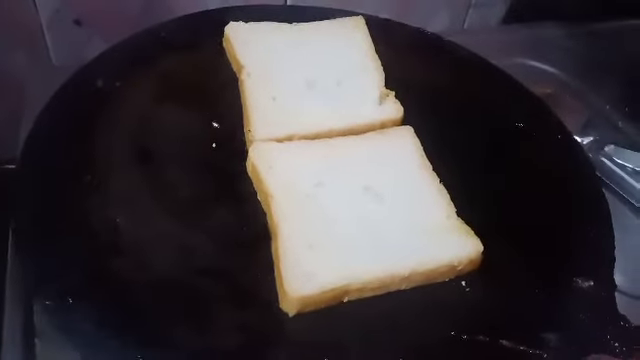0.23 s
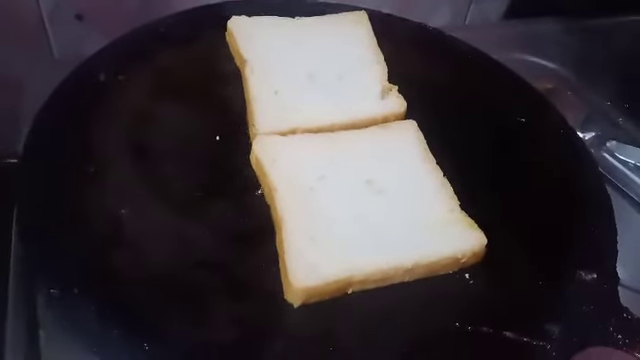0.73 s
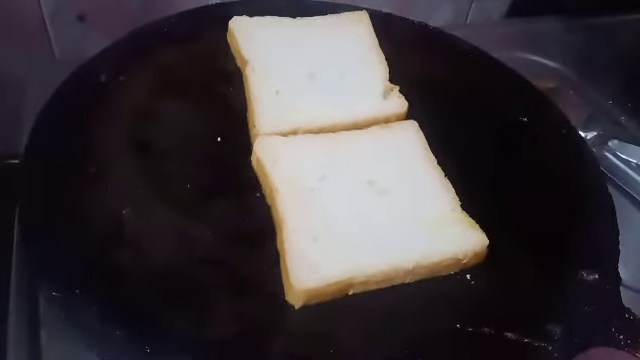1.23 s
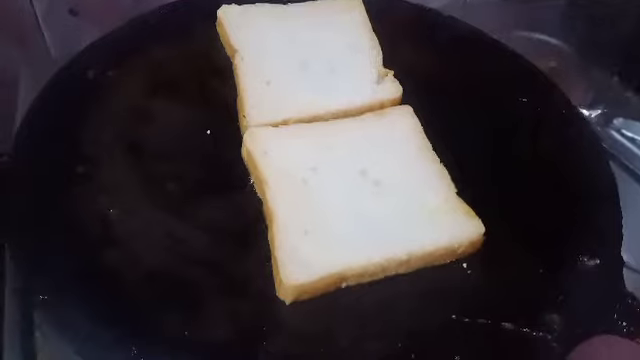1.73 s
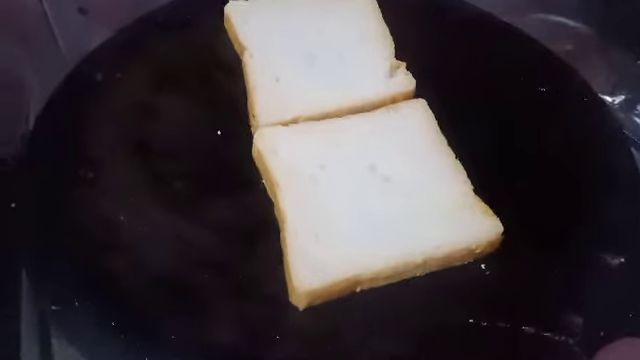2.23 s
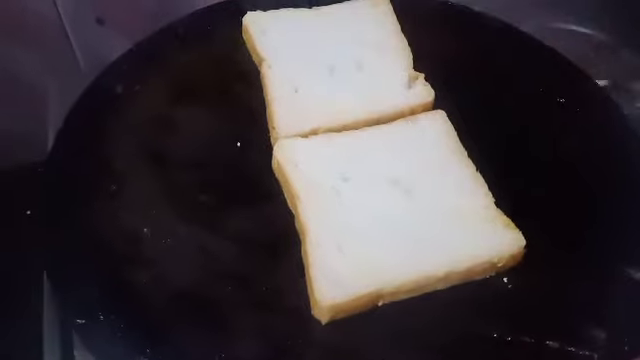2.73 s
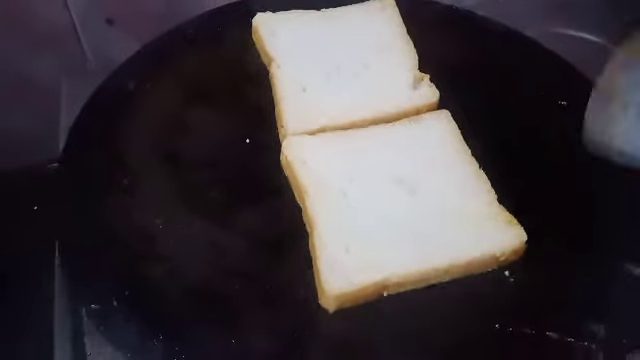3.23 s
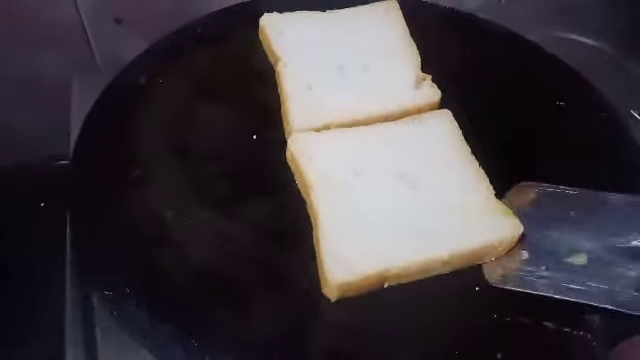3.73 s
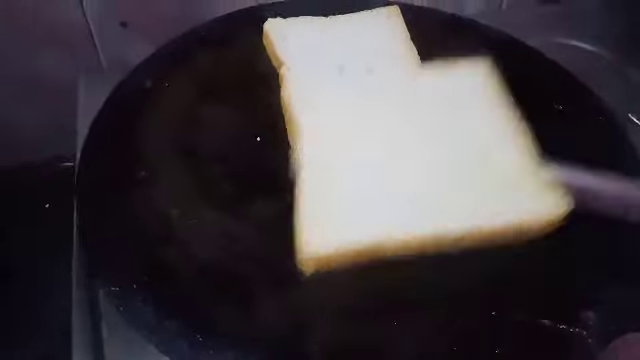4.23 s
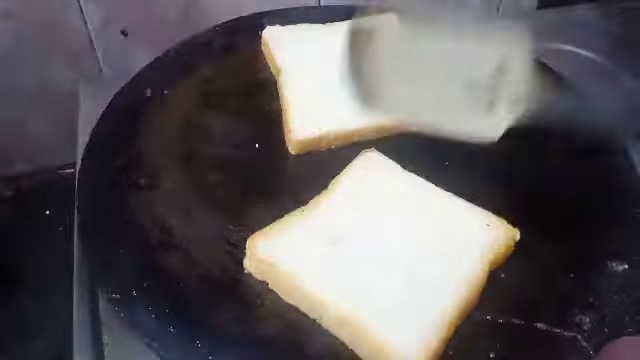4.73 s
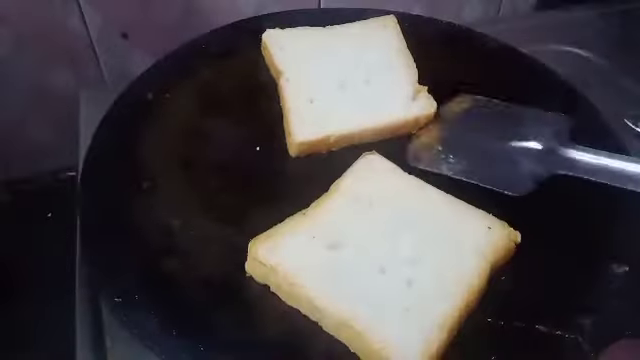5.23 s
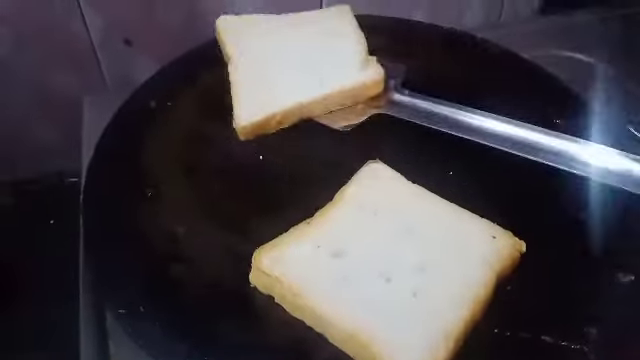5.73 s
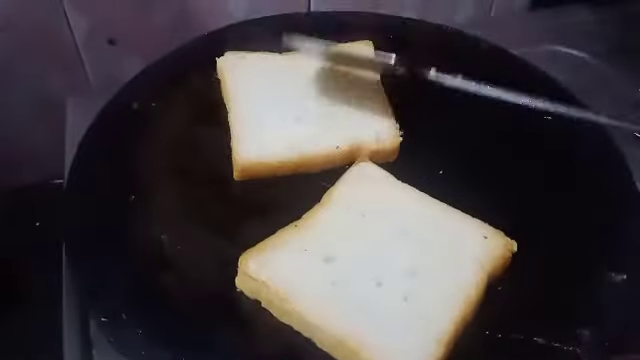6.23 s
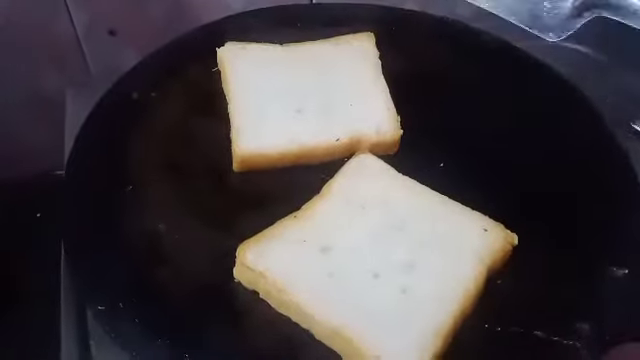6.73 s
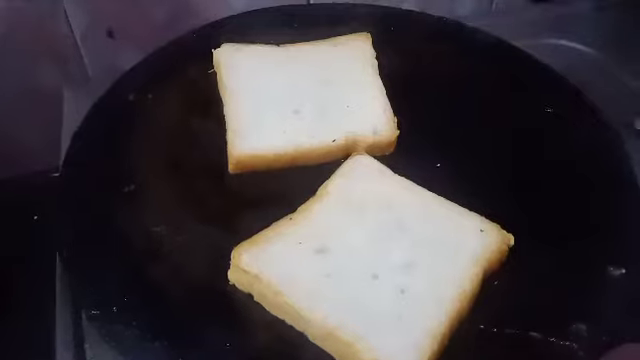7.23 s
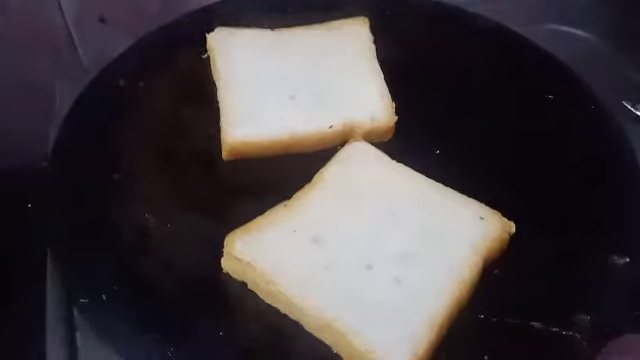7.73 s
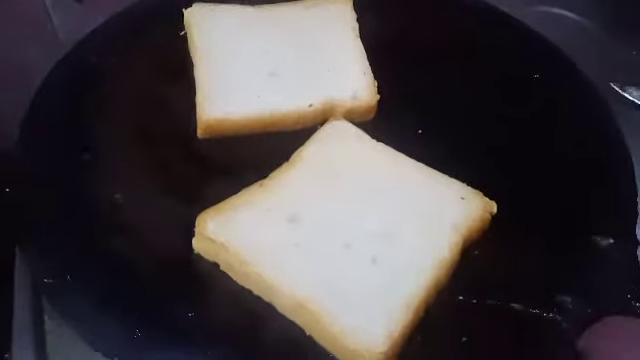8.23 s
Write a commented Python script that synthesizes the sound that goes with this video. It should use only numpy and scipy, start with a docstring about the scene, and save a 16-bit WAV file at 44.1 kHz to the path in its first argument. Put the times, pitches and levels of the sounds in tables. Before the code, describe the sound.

Quiet frying hiss in a small kitchen, a steel clink, then spatula knocks, two short scrapes and soft bread thuds, with crackle growing afterwards.

```python
"""A low rumble, a faint sizzle and a thin whistle in a small kitchen; bread toasts on a flat iron griddle.
A steel utensil clinks; a spatula is picked up, knocks on the iron, scrapes under each of two slices and
flips it; the turned slices make the fat spit. Struck bodies are sums of decaying modes, scrapes are random
slips through such modes, frying is dense random clicks, rumble and air are filtered noise."""
import sys
import numpy as np
from scipy import signal
from scipy.fft import rfft, irfft, next_fast_len
from scipy.io import wavfile
from scipy.ndimage import uniform_filter1d, map_coordinates

SR = 44100
rng = np.random.default_rng(int(sys.argv[2]) if len(sys.argv) > 2 else 0)


def generate_wav(signal):
    """Clip the signal to [-1, 1] and save it as 16-bit WAV at the path in sys.argv[1]."""
    frames = np.transpose(np.atleast_2d(signal))
    scaled = np.clip(frames, -1, 1) * 32767
    pcm = np.round(scaled).astype(np.int16)
    wavfile.write(sys.argv[1], SR, pcm)


N = 373022
TIME = np.arange(N) / SR
CUTOFF_HZ = 15900

# spectrum of clattering iron: pitch_hz, level_db
CLATTER_SPECTRUM = [(200, 8.5), (450, -0.5), (650, 1.5), (1400, -2.5), (2000, -3), (3900, 3), (5000, 0),
                    (7300, 12), (8700, 0.5), (11000, 9), (16000, 16)]


def amp(db):
    """Amplitude factor of a level in dB."""
    return 10 ** (np.asarray(db) / 20)


def rms_one(x):
    """Scale to rms 1."""
    return x / np.sqrt(np.mean(x ** 2) + 1e-20)


def colour(x, points):
    """Shape a sound by a spectrum of (Hz, dB) points, interpolated over log frequency."""
    hz, db = np.transpose(points)
    size = next_fast_len(len(x) + SR // 10)
    bins_hz = np.maximum(np.fft.rfftfreq(size, 1 / SR), 1)
    gain = amp(np.interp(np.log(bins_hz), np.log(hz), db))
    return irfft(rfft(x, size) * gain, size)[:len(x)]


def band(x, low_hz, high_hz, order=2):
    """Butterworth band-pass, its edges kept within the valid range."""
    edges_hz = np.clip([low_hz, max(high_hz, low_hz * 1.02)], [10, 20], [.43 * SR, .45 * SR])
    return signal.sosfilt(signal.butter(order, edges_hz, "band", fs=SR, output="sos"), x)


def noise(size=N):
    """White noise of spread 1."""
    return rng.standard_normal(size)


def drift(rate, size=N):
    """Slow chance: straight lines between random knots of spread 1, rate knots per second."""
    knots = rng.standard_normal(4096)
    return np.interp(TIME[:size] * rate, np.arange(len(knots)), knots)


def fade(t60_s):
    """One second of exponential decay."""
    return amp(-60 * TIME[:SR] / max(t60_s, 1e-4))


def ring(modes, tilt_db=0, length=1, scatter_db=0, flutter_db=0):
    """One second of a struck body; scatter reweights its modes at each blow, flutter wavers their levels."""
    chance = rng.standard_normal(len(modes))
    out = np.zeros(SR)
    for k, (hz, db, t60_s) in enumerate(modes):
        mode_db = db + tilt_db * np.log2(hz / 1500) + scatter_db * chance[k]
        level = amp(mode_db + flutter_db * drift(86, size=SR))
        out += (-1) ** k * level * fade(t60_s * length) * np.sin(2 * np.pi * hz * TIME[:SR])
    return out


def add(out, s, sound):
    """Mix a sound in at s seconds."""
    start = max(int(s * SR), 0)
    out[start:start + len(sound)] += sound[:N - start]


def through(x, response):
    """Convolve with a response."""
    return signal.oaconvolve(x, response)[:N]


def grains(per_s, spread_db):
    """Random clicks, most of them small; rms 1."""
    sizes = amp(spread_db * np.minimum(rng.exponential(1, N), 5)) * rng.choice([-1, 1], N)
    return rms_one(sizes * (rng.random(N) < per_s / SR))


def envelope(s, length_s, attack_s, release_s):
    """A straight rise, a hold until the length is over, an exponential release."""
    rise = np.clip((TIME - s) / attack_s, 0, 1)
    return rise * np.exp(-np.maximum(TIME - s - length_s, 0) / release_s)


def wavering(hz, wobble, rate):
    """A sine whose pitch wanders by a share of itself."""
    return np.sin(2 * np.pi * np.cumsum(hz * (1 + wobble * drift(rate))) / SR)


def evened(x, size=2205):
    """Level held near rms 1 over about 50 ms; the fine grain stays."""
    return x / np.sqrt(np.maximum(uniform_filter1d(x ** 2, size), 1e-20))


def kitchen(x):
    """Near walls return a short diffuse tail of unit energy."""
    onset = np.clip(TIME[:SR] / 0.00024 - .5, 0, 1)
    tail = band(noise(SR), 120, 6300, order=1) * fade(0.34) * onset
    return through(x, tail / np.sqrt(np.sum(tail ** 2)))


def background(count=26):
    """A lumpy low rumble swells now and then; faint narrow bands waver over the still air of the room."""
    # strongest swells of the rumble: centre_s, level_db, pitch_hz
    swells = [(.12, -54.5, 88.6), (.32, -53, 85.4), (1.228, -53, 99.2), (1.398, -64, 253),
              (4.39, -56, 90.8), (6.138, -55.5, 110), (7.064, -49.5, 243.4), (7.166, -49.5, 110),
              (7.255, -50, 236.3), (7.648, -49, 108), (7.99, -50.5, 107)]
    # spectrum of the wavering room hum: pitch_hz, level_db
    waver_spectrum = [(450, 0.5), (620, 1.5), (900, 5), (1150, 0), (1550, 6.5), (2000, 0), (2800, 2.5),
                      (3800, -32)]
    # spectrum of the still air: pitch_hz, level_db
    air_spectrum = [(25, -2), (50, 4.5), (90, 16.5), (115, 16), (155, 4.5), (230, 10), (330, 6.5),
                    (410, -6.5), (620, -8), (1200, -27), (2800, -10), (4000, -16), (16000, -41)]
    rumble_hz, swell_cycles = 100, 7.5  # cycles from a swell's peak down to 1/e
    low = rms_one(band(noise(), rumble_hz / 1.05, rumble_hz * 1.12))
    boom = rms_one(band(noise(), 208, 287.4))  # upper part of the rumble
    rumble = amp(-70 + 4.5 * drift(9.1)) * low + amp(-74 + 6.5 * drift(18)) * boom
    for s, db, hz in swells:
        swell = amp(db + 2 * drift(45)) * np.exp(-((TIME - s) * hz / swell_cycles) ** 2)
        rumble += swell * wavering(hz, wobble=0.088, rate=130)
    patches = np.zeros(N)
    for hz in np.geomspace(520, 3500, count):
        patches += band(noise(), hz / 1.015, hz * 1.045) * amp(12.3 * np.tanh(drift(12)))
    hum = amp(-67.0) * rms_one(colour(patches, waver_spectrum))
    air = amp(-66.5) * rms_one(colour(noise(), air_spectrum))
    return rumble + hum + air


def frying():
    """Countless tiny bursts merge into a hiss; turned bread adds coarser crackle, steam escapes in puffs."""
    # vigour of the frying: time_s, level_db
    vigour_points = [(0, -58.5), (2.4, -54), (3.3, -53.5), (5.5, -55.5), (8, -51), (8.46, -54.5)]
    # spectrum of the hiss: pitch_hz, level_db
    hiss_spectrum = [(2500, -24.5), (4200, -15), (5000, -8.5), (5700, -3), (6600, 0.5), (7500, -5.5),
                     (8700, -13.5), (13000, -18), (16000, -18)]
    # turned slices that crackle as they heat: landing_s, crackle_db (against the vigour)
    flips = [(4.54, -17.5), (6.1, -7)]
    # steam squeezed out under the bread: start_s, length_s, level_db, release_s
    puffs = [(0, 0.91, -66.5, 1), (4.251, 0.026, -52.5, 0.073), (7.374, 0.035, -56.5, 0.05)]
    heating_s, puff_attack_s = 0.26, 0.033
    unturned_db, seeping_db = -42, -18  # against the vigour

    fine = amp(0.35 * drift(31)) * rms_one(colour(grains(per_s=14000, spread_db=3.5), hiss_spectrum))
    ticks = band(grains(per_s=180, spread_db=6.5), 4200, 27000)
    coarse = rms_one(ticks + kitchen(ticks))
    vigour_s, vigour_db = np.transpose(vigour_points)
    vigour = amp(np.interp(TIME, vigour_s, vigour_db))
    crackle = amp(unturned_db)
    for s, db in flips:
        crackle = crackle + amp(db) * (1 - np.exp(-np.maximum(TIME - s, 0) / heating_s))
    flow = amp(seeping_db) * vigour
    for s, length_s, db, release_s in puffs:
        flow += amp(db) * envelope(s, length_s, puff_attack_s, release_s)
    steam = flow * amp(2.5 * drift(23)) * rms_one(band(noise(), 2650, 3400))
    return vigour * (amp(-3.5) * fine + crackle * coarse) + steam


def thin_tones():
    """Faint whistles and a low scuff come and go; the blade's lingering rings are beating sines."""
    # faint whistles and a low scuff: start_s, length_s, pitch_hz, level_db
    faint_tones = [(0, 0.84, 3420, -61), (2.486, 0.095, 720, -56.5), (6.876, .11, 932, -59.5),
                   (7.038, 0.18, 1046, -58)]
    # blade ringing on, held free or after its tip touches the iron: start_s, length_s, pitch_hz,
    # level_db, release_s, beat_depth (0-1)
    lingering_rings = [(2.68, 0.6, 1404, -53.5, 0.025, 0.26), (4.58, 0.99, 4721, -69.5, 0.04, 0.1),
                       (4.951, 0.1, 5700, -44.5, 0.12, 1)]
    beat_hz = 49.3
    out = np.zeros(N)
    for s, length_s, hz, db in faint_tones:
        level = amp(db + 4.6 * drift(70)) * envelope(s, length_s, attack_s=0.0038, release_s=0.046)
        out += level * wavering(hz, wobble=0.0119, rate=260)
    for s, length_s, hz, db, release_s, depth in lingering_rings:
        level = amp(db + 0.8 * drift(43)) * envelope(s, length_s, 0.015, release_s)
        tone = wavering(hz, wobble=0.00199, rate=100)
        beat = depth * wavering(hz + beat_hz, wobble=0.0019, rate=60)
        out += level * (tone + beat)
    return out


def sharp_ticks():
    """Fat spits, and a few times the blade tips the iron: cycles of treble, then a brief fizz."""
    # loudest sharp ticks, mostly spitting fat, a few from the blade tip on iron:
    # time_s (burst 1.2 ms later), level_db (relative)
    ticks = [(0.2369, -33), (4.5433, -29.5), (4.9412, -28), (5.0174, -29), (6.096, -39), (6.264, -34.5),
             (6.4015, -33), (6.603, -33.5), (6.632, -32), (6.9083, -35), (7.0023, -27.5), (7.128, -26.5),
             (7.3403, -25.5), (7.695, -27), (7.87, -29), (7.8976, -32.5), (8.0441, -33), (8.0835, -29.5),
             (8.104, -32)]
    out = np.zeros(N)
    for s, db in ticks:
        low_chance, high_chance = rng.standard_normal(2)
        low_hz, high_hz = 6200 * np.exp(0.049 * low_chance), 14500 * np.exp(0.023 * high_chance)
        burst = ring([(low_hz, 0, .0028), (9000, -4, .0014), (high_hz, -9, .001)])
        fizz = rms_one(band(noise(SR) * amp(2.1 * drift(900, size=SR)), 2900, 23500))
        spray = amp(-24.5) * fizz * fade(0.098)
        add(out, s + 0.0012, amp(db + 6.5) * (burst + spray))
    return band(out, 4300, 16000)  # too small to radiate low notes


def utensil():
    """A steel utensil chatters on its neighbour: each crack pumps the same modes; loose steel flutters."""
    # contacts: start_s, ring_db, crack_db
    clinks = [(0.9911, -45, -24), (0.997, -27.5, -38), (1.006, -30, -26.5), (1.027, -26.5, -37),
              (1.1, -38, -44), (1.137, -43.5, -45)]
    # modes: pitch_hz, level_db, t60_s
    modes = [(3084, -9, 0.11), (3073, 2.5, 0.14), (3100, -13, 0.18), (5200, -4.5, 0.22), (5240, -6, 0.3),
             (6500, -16, 0.13), (6940, -9.5, 0.16), (8900, -17, 0.11), (9768, -18, 0.15),
             (11060, -8.5, 0.08), (14770, -23, 0.11), (15330, -22, .13)]
    out, pushes = np.zeros(N), np.zeros(N)
    for s, ring_db, crack_db in clinks:
        middle = band(noise(SR), 5450, 10000)
        low = amp(-16.5) * band(noise(SR), 880, 6900)
        high = amp(-11.5) * band(noise(SR), 9800, 17000)
        add(out, s, amp(crack_db) * rms_one(middle + low + high) * fade(0.11))
        add(pushes, s, amp([ring_db]))
    pushes = uniform_filter1d(pushes, size=176)  # the ring builds over a few milliseconds
    for hz, db, t60_s in modes:
        swing = signal.lfilter([1], [1, -amp(-60 / (t60_s * SR))], pushes + 1e-18)
        level = amp(db + 4.0 * drift(110))
        out += level * swing * np.sin(2 * np.pi * hz * TIME + drift(50.5) * hz / 7000)
    return out


def iron_ring(t60_s, count=110):
    """The plate's many close modes, each struck with its own strength and phase."""
    out, t = np.zeros(SR), TIME[:SR // 2]
    hz = np.geomspace(250, 12000, count) * np.exp(.015 * rng.standard_normal(count))
    strength = rng.standard_normal(count) * np.sqrt(hz)
    cycles = hz[:, None] * t + rng.random((count, 1))
    out[:len(t)] = strength @ np.sin(2 * np.pi * cycles.astype(np.float32))
    return rms_one(out) * fade(t60_s)


def knocks():
    """The griddle thuds on its stand while its many damped modes give a short clatter."""
    # spatula and bread on the griddle: start_s, thud_db, thud_hz, clatter_db, clatter_centre_hz,
    # clatter_t60_s, edge_tick_db (against the clatter)
    contacts = [(2.368, -27, 315, -28, 1540, 0.065, 2), (2.381, -26, 328, -29, 905, 0.073, 1),
                (2.396, -41, 310, -32, 1080, 0.046, -16), (2.497, -39, 263, -44.5, 700, 0.17, -14),
                (2.639, -21.5, 233, -40, 750, 0.18, -5), (2.765, -32, 224, -50, 1500, 0.29, 6),
                (3.291, -42.5, 313, -21.5, 3050, 0.051, -2.5), (3.673, -70, 282, -36, 1600, 0.11, -29),
                (3.74, -49, 281, -39, 1440, 0.15, -8), (4.264, -45, 243, -41, 4200, 0.19, -19),
                (4.542, -30.5, 246, -27.5, 1200, 0.042, -19), (4.611, -43, 228, -44.5, 1160, 0.078, -20),
                (5.028, -57, 287, -33, 3140, 0.14, 4), (6.104, -29.5, 212, -41, 1030, 0.22, -6),
                (6.333, -54, 198, -50, 1520, 0.18, 2)]
    # griddle on its stand: pitch_hz, level_db, t60_s
    stand = [(228.3, -1, .13), (290, -12, 0.047), (313, -6, 0.13), (481, -1.5, 0.12)]
    half_width = 2 ** (1.6 / 2)  # one contact excites 1.6 octaves
    out = np.zeros(N)
    for s, thud_db, thud_hz, clatter_db, centre_hz, t60_s, edge_db in contacts:
        rattle = noise(SR) * fade(t60_s) * amp(3.8 * drift(180, size=SR) + 5.5)  # dies out unevenly
        plate = colour(iron_ring(t60_s) + rattle, CLATTER_SPECTRUM)
        clatter = rms_one(band(plate, centre_hz / half_width, centre_hz * half_width))
        clatter *= np.sqrt(np.mean(fade(t60_s) ** 2))
        edge = amp(edge_db) * rms_one(band(noise(SR), 2100, 12000, order=4)) * fade(0.018)
        add(out, s, amp(clatter_db) * (clatter + edge) * (1 - fade(0.014)))
        judder = amp(-16.5) * rms_one(band(noise(SR), 180, 254)) * fade(0.72)  # the loose stand shakes on
        thud = band(ring(stand) + judder, thud_hz / 1.12, thud_hz * 1.127, order=1)
        add(out, s, amp(thud_db) * thud * (1 - fade(0.075)))  # the heavy iron takes a moment to swing
    return out


def blade_modes(along):
    """The spatula's modes for a contact between its tip (0) and its side edge (1)."""
    # pitch_hz, tip_level_db, side_edge_level_db, t60_s
    modes = [(470, -38, 3, 0.22), (740, -33, -24, .23), (979, -24.5, -31, 0.44), (1263, -14, -1, 0.36),
             (1395.5, 1.5, -6, 0.55), (1544, 0.5, -1, 0.29), (1620, -8, 0, 0.085), (1900, -23, -5.5, 0.21),
             (2367, -21, -4, 0.22), (2462, -9, -12, 0.1), (2840, -20, -22, 0.18), (3263, -16.5, -15, 0.23),
             (3550, -26, -11, 0.61), (4270, -24, -18, 0.17), (4413, -7.5, -4.5, .14),
             (4950, -24, -14.5, 0.43), (5420, -3, -9, 0.093), (5620, -4, -8, 0.083), (5720, -4, -20, 0.099),
             (5990, -13, -15, 0.11), (6300, -4, -3, 0.096), (6770, -29, -3, 0.12), (7500, -15, -18, 0.15),
             (7833, -14, -10.5, 0.2), (10700, -25, -19, 0.23), (14260, -26, -20, .2)]
    along = np.clip(along, 0, 1)
    return [(hz, tip_db + along * (edge_db - tip_db), t60_s) for hz, tip_db, edge_db, t60_s in modes]


def spatula():
    """The blade rings until the hand chokes it; a contact on the side edge sets in more softly."""
    # start_s, level_db, tilt_db_per_octave, ring_length (1 free, less when pressed on the iron),
    # contact_place (0 tip, 1 side edge)
    blows = [(2.371, -51.5, 7, 0.5, 0.3), (2.646, -43, -1.5, 0.89, .9), (2.779, -40.5, 0, 0.46, 0.95),
             (2.825, -48.5, 4.5, 0.31, 1), (3.291, -24.5, -1.5, 0.85, 0), (4.542, -31.5, -2.5, 0.24, 0.53),
             (5.025, -33.5, 4.5, 0.26, 0.4), (6.108, -51.5, 4.5, 0.53, 0.52)]
    glance_s, grip_s = 0.015, 0.24  # slowest build-up; closing of the hand
    out = np.zeros(N)
    for s, db, tilt_db, length, along in blows:
        swing = (1 - fade(glance_s * along)) * np.exp(-(TIME[:SR] / grip_s) ** 2)
        blade = ring(blade_modes(along), tilt_db, length, scatter_db=0.5, flutter_db=5.0)
        add(out, s, amp(db) * swing * blade)
    return band(out, 340, 18000)  # too thin to radiate low notes


def travelling(slips, responses):
    """The moving edge favours ever different modes and bends their pitch: slips fade between responses."""
    shares = np.array([amp(6 * drift(26)) for _ in responses])
    shares = shares / np.linalg.norm(shares, axis=0)
    ringing = np.zeros(N)
    for share, response in zip(shares, responses):
        ringing += share * rms_one(through(slips, response))
    place = np.cumsum(1 + 0.018 * drift(16))  # reading speed varies, so the pitch bends
    return map_coordinates(ringing, [place], order=3, mode="mirror")


def scrapes():
    """The edge slips over rough iron; slips rasp, shake blade and stand, and squeal where the edge catches."""
    # blade slides under a slice, pressing harder where build_up_db > 0: start_s, length_s, final_db,
    # build_up_db, release_s, squeal_hz, stand_shake_db, blade_ring_db, coarse_grit_db,
    # lowest_hz (that the pressed blade lets ring)
    strokes = [(3.727, 0.23, -45.5, 0, 0.042, 2339, -49, -1, -7, 1030),
               (5.113, 0.26, -39.5, 9.5, 0.072, 1561, -16, -4, -5, 1330)]
    # the edge catches for a moment: start_s, length_s, extra_friction_db, extra_squeal_db
    catches = [(3.797, 0.047, 6, -5), (3.858, 0.019, 1.5, 20.5), (3.93, 0.024, 2, 14),
               (5.318, 0.01, -1.5, 17), (5.35, .035, -2.5, 11.5)]
    # pitch_hz, level_db
    rasp_spectrum = [(520, -12), (750, 3), (1300, 4.5), (2050, -1), (2500, 4), (4000, -1), (6460, 8),
                     (10200, -10.5), (16000, 6.5)]
    stroke_attack_s = 0.027

    slips = grains(per_s=5600, spread_db=3.0) * amp(5.1 * drift(160))
    plate = travelling(slips, [iron_ring(0.048) for _ in range(4)])
    rasp = evened(colour(plate + amp(-3) * rms_one(slips), rasp_spectrum))
    blade_responses = [ring(blade_modes(0.87), tilt_db=-1.5, length=0.33, scatter_db=3) for _ in range(3)]
    blade = evened(travelling(slips, blade_responses))
    shaking = evened(band(slips, 256, 324) + amp(-12.5) * band(slips, 503, 554))
    crumbs = through(grains(per_s=240, spread_db=3.5), iron_ring(0.021))  # coarse slips over burnt crumbs
    grit = evened(band(crumbs, 1400, 3350))

    squeal = amp(-9.5 + 2 * drift(120))
    grip = np.ones(N)
    for s, length_s, grip_db, squeal_db in catches:
        caught = envelope(s, length_s, attack_s=0.0024, release_s=0.0076)
        grip = grip * amp(grip_db * caught)
        squeal = squeal * amp(squeal_db * caught)

    # the spatula is dragged off its rest
    drag = evened(band(colour(plate + slips, CLATTER_SPECTRUM), 260, 3700, order=1))
    out = amp(-47.5) * envelope(2.43, 0.089, stroke_attack_s, release_s=0.027) * drag
    for (s, length_s, db, build_db, release_s, squeal_hz,
         stand_db, blade_db, grit_db, lowest_hz) in strokes:
        contact = amp(-2.5) * rasp + amp(blade_db) * blade + amp(grit_db) * grit
        friction = band(contact, lowest_hz, CUTOFF_HZ, order=4)
        pressure_db = db - build_db * np.clip(1 - (TIME - s) / length_s, 0, 1)
        pressure = amp(pressure_db) * envelope(s, length_s, stroke_attack_s, release_s)
        whine = squeal * wavering(squeal_hz, wobble=0.0156, rate=300)
        out += pressure * (grip * (friction + whine) + amp(stand_db) * shaking)
    return out


def scene():
    """All sources, with room tails for iron, utensil and ticks, heard through two microphone ports."""
    # left minus right of the ports: pitch_hz, difference_db
    balance = [(90, 2), (200, 4), (700, 4), (1400, 7.5), (2400, 4), (4500, 5), (6000, 3), (7200, -3.5),
               (8000, -20.5), (9000, -5.5), (10500, -40), (12500, -5), (14500, -6), (16000, 13)]
    still = background() + frying() + thin_tones()
    ticks, clink = sharp_ticks(), utensil()
    iron = knocks() + spatula() + scrapes()
    room = kitchen(amp(-7.0) * iron + amp(-7.5) * clink + amp(-8.5) * ticks)
    sound = still + ticks + clink + iron + room
    ports = []
    for side in (1, -1):  # left, right
        response = [(hz, 20 * np.log10(2 / (1 + amp(-side * db)))) for hz, db in balance]
        ports.append(colour(sound, response))
    # treble tail and faint low noise, opposite in sign at the two ports
    treble = amp(-15.0) * kitchen(band(sound, 9100, 15840))
    spread = treble + amp(-86.5) * rms_one(band(noise(), 18, 147, order=1))
    return np.array([ports[0] + spread, ports[1] - spread])


def record(dry):
    """The top is cut steeply."""
    return signal.sosfilt(signal.ellip(10, .2, 80, CUTOFF_HZ, fs=SR, output="sos"), dry)


dry = scene()
out = record(dry)
generate_wav(out)
```